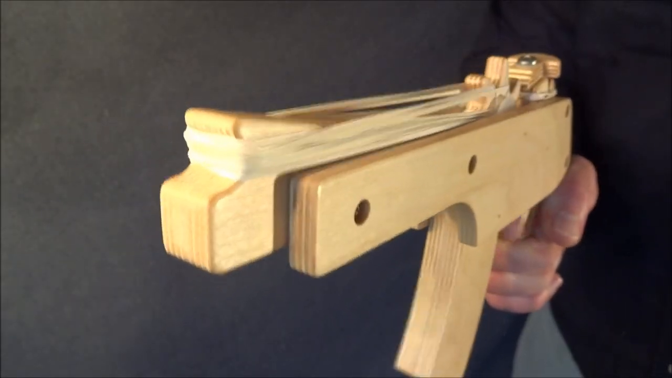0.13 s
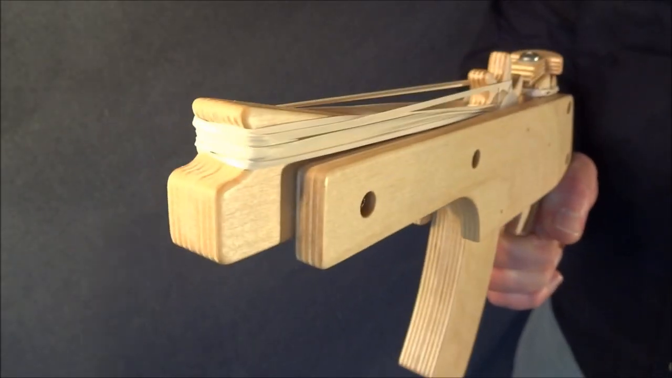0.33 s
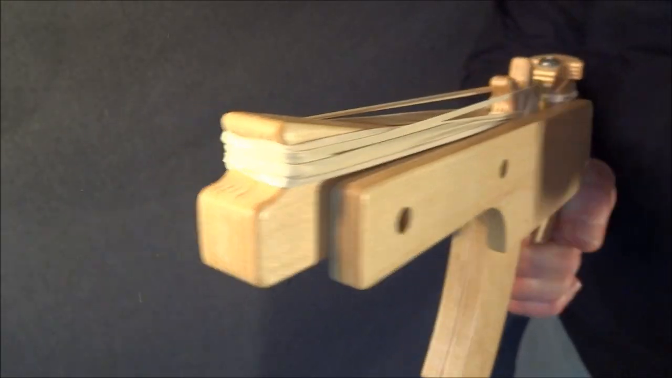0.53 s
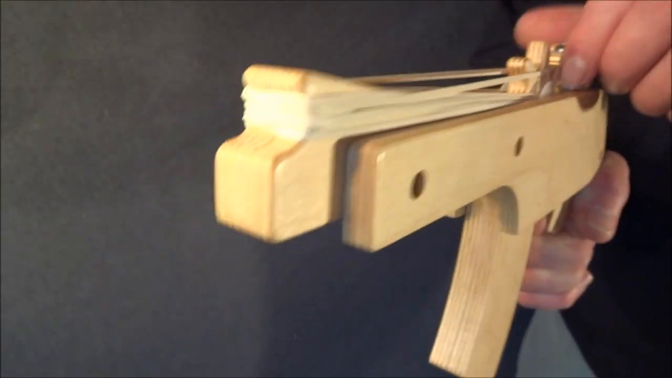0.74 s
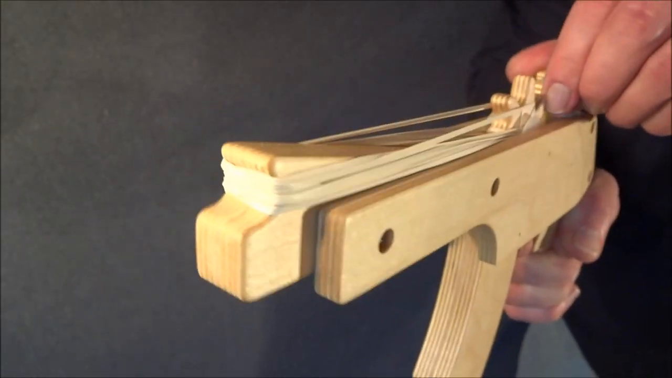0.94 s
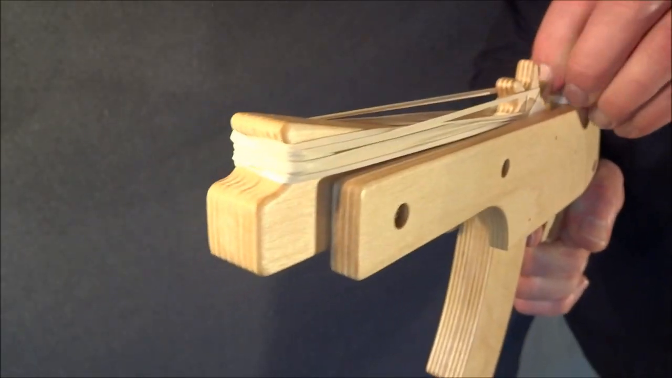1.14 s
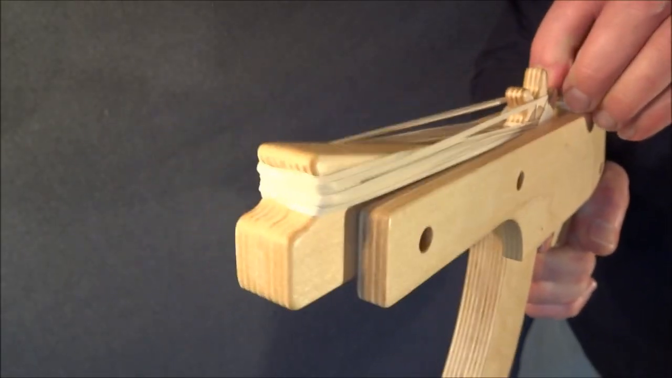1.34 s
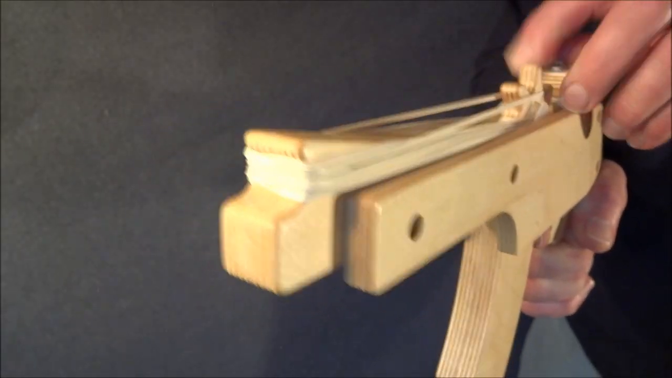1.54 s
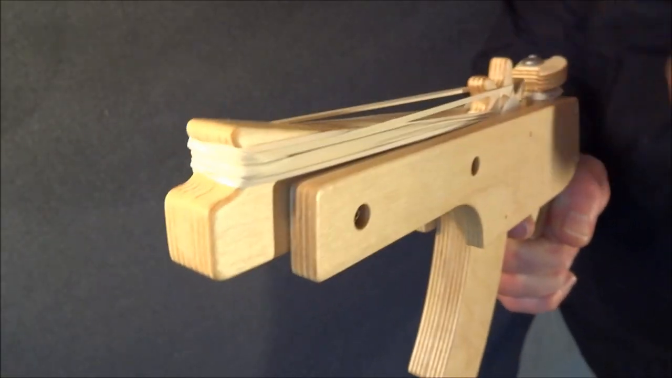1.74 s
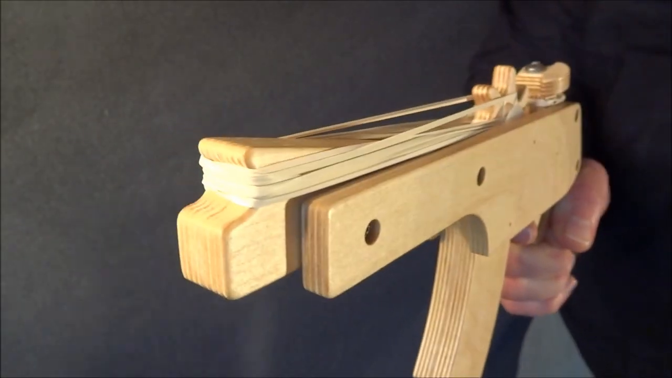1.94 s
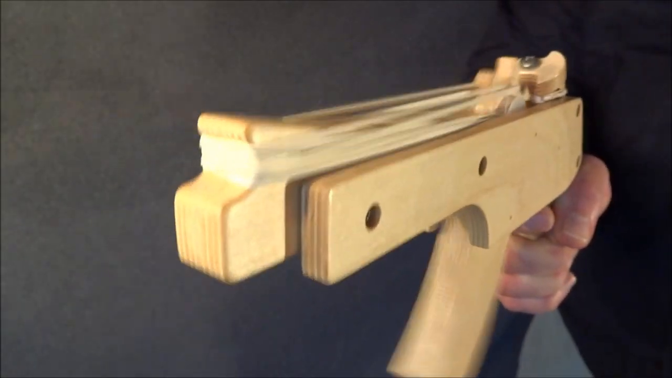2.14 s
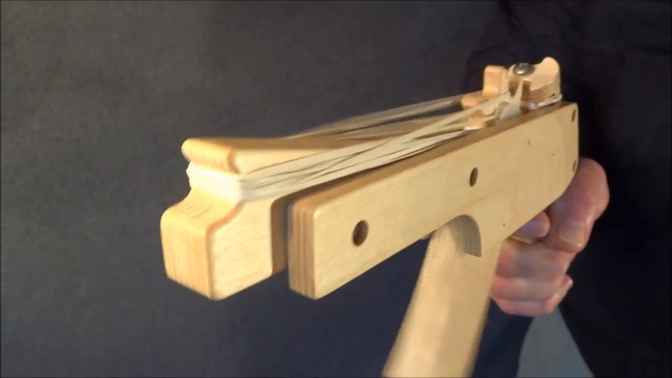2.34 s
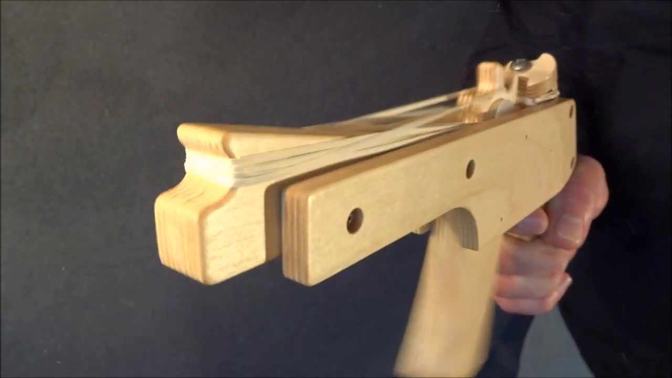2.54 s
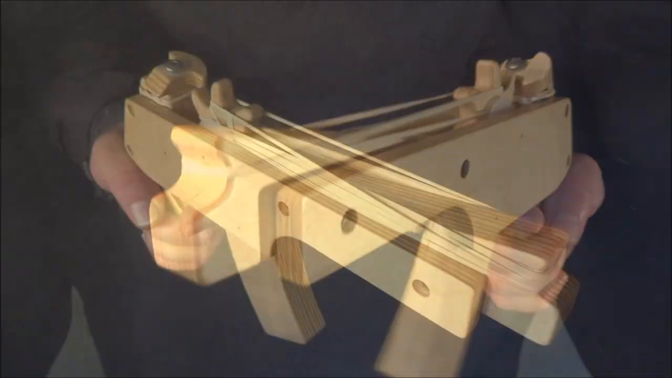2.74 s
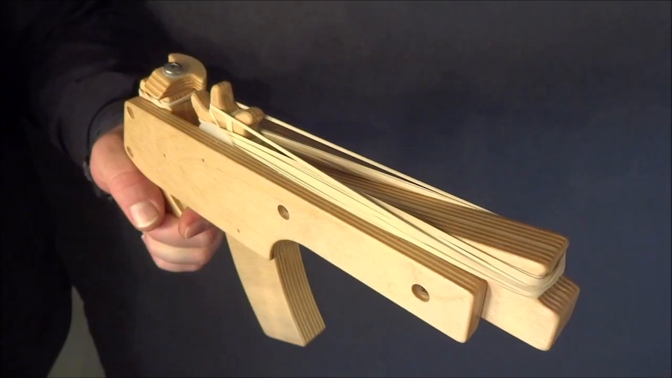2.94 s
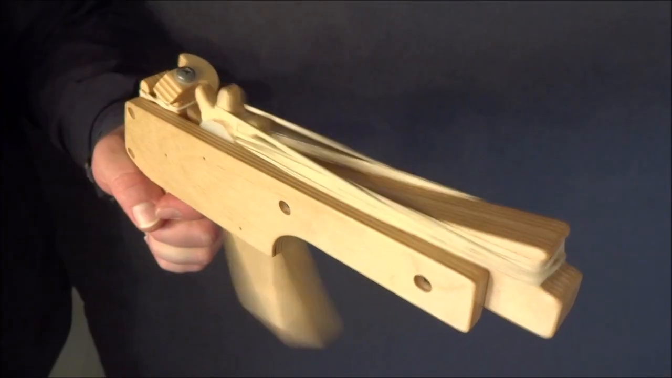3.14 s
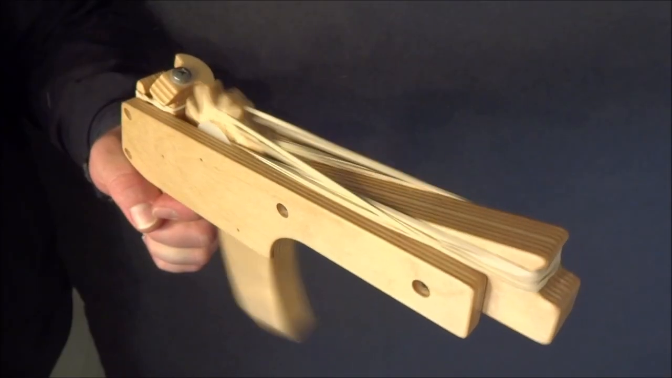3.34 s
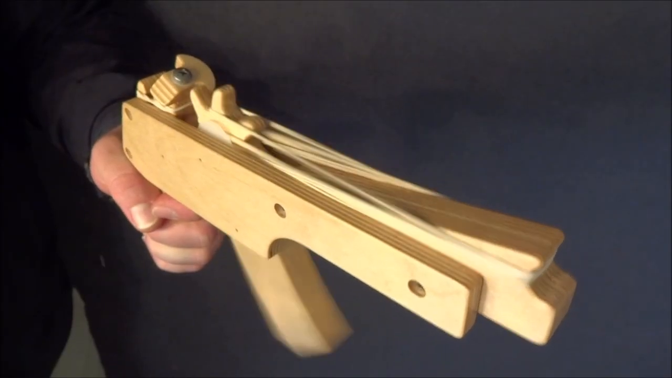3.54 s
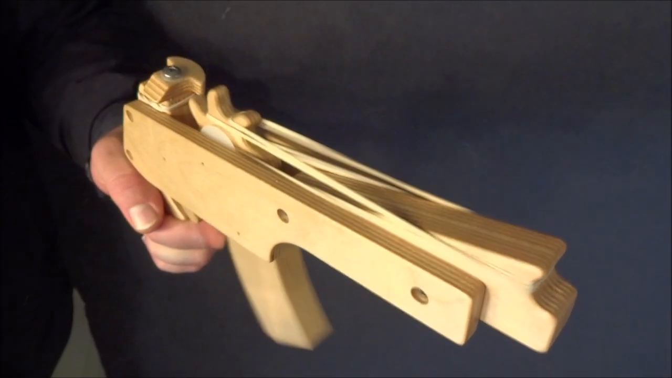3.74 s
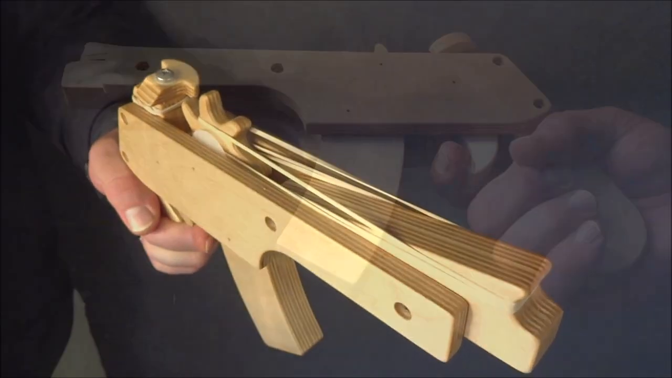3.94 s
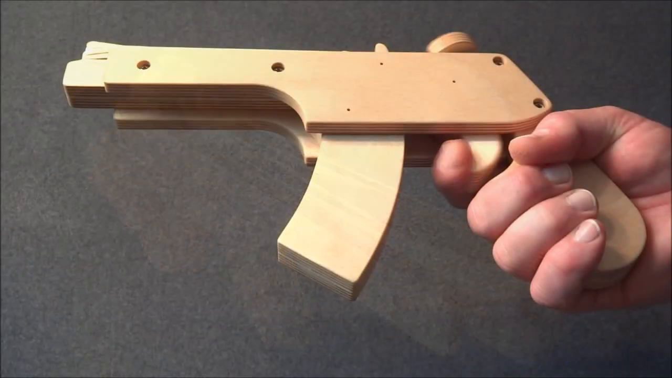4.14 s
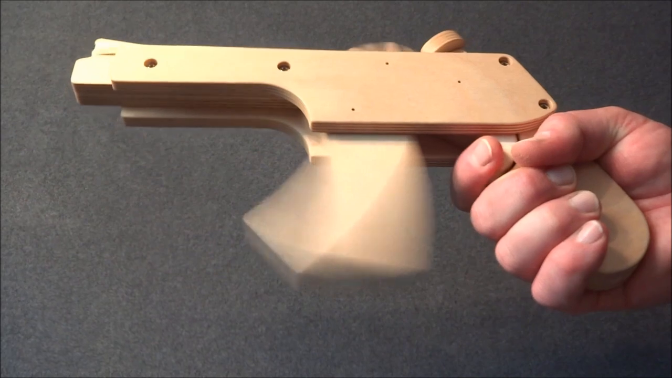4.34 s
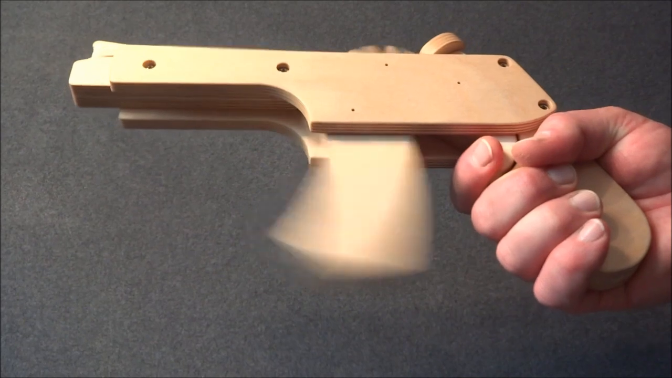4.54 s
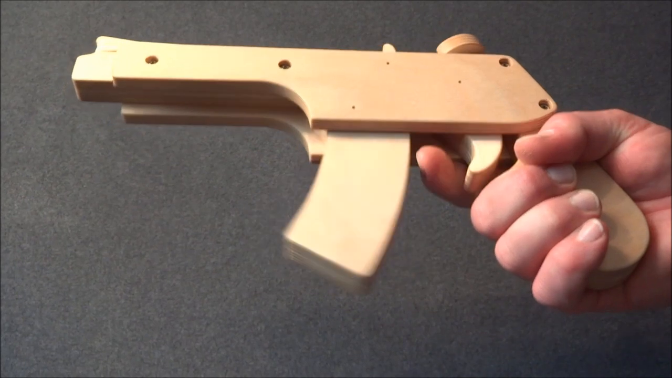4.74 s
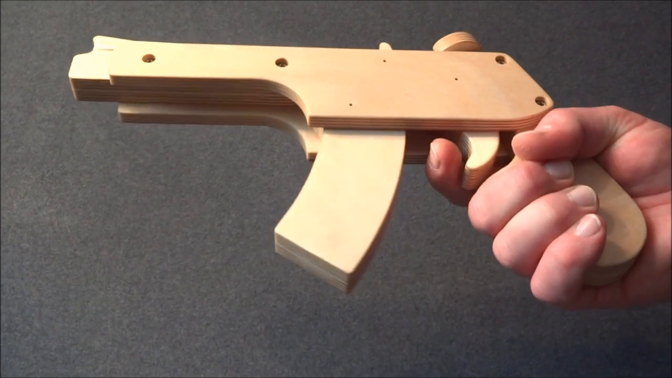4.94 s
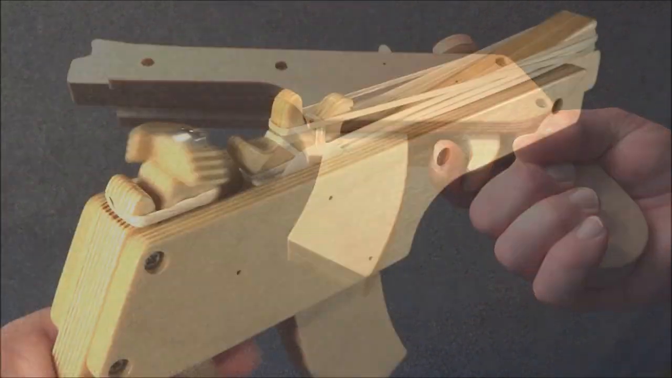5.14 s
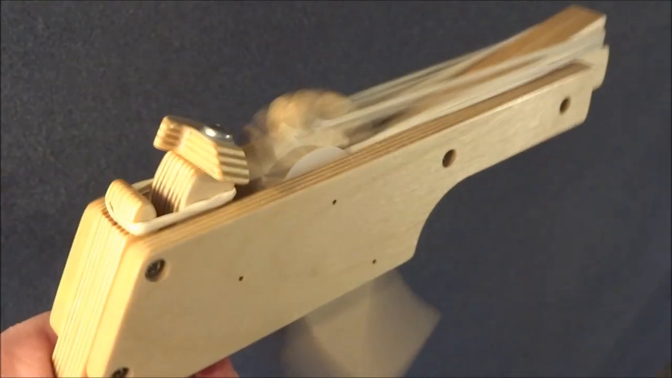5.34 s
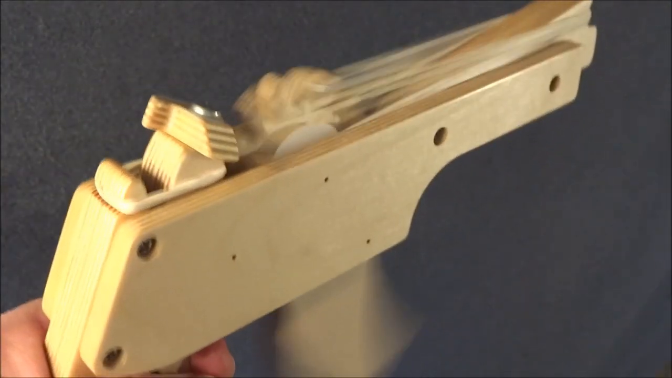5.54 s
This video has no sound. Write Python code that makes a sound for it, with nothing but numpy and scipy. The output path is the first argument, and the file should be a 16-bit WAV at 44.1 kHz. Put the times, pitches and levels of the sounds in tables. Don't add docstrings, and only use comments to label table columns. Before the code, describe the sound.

A close microphone catches a hand-made wooden toy gun indoors: one bright tick, a duller tock, a short hollow band slap, then nearly two seconds of quiet handling with rustles, light taps and a tiny squeak. Four hard, dry rattles come next, alternating ticks and tocks at roughly twenty cycles a second, easing slower. Loose clicks and short rustles fill the gaps; background hiss shifts at cuts.

```python
import sys
import numpy as np
from scipy import signal
from scipy.fft import rfft, irfft
from scipy.io import wavfile
from scipy.ndimage import uniform_filter1d, minimum_filter1d

SR = 44100
rng = np.random.default_rng(int(sys.argv[2]) if len(sys.argv) > 2 else 0)


def amplitude_ratio(level_db):
    exponent = np.asarray(level_db, float) / 20
    return 10 ** exponent


def to_wav(s):
    ch = np.atleast_2d(s).T
    pcm = np.round(np.clip(ch, -1, 1) * 32767)
    wavfile.write(sys.argv[1], SR, pcm.astype(np.int16))


N = 246959


def in_time(rows):
    s, *columns = np.transpose(rows)
    return [np.interp(np.arange(N) / SR, s, c) for c in columns]


def coloured(x, spectrum):
    hz = np.maximum(np.arange(x.shape[-1] // 2 + 1) * SR / x.shape[-1], 1)
    point_hz, point_db = np.transpose(spectrum)
    gain = amplitude_ratio(np.interp(np.log(hz), np.log(point_hz), point_db))
    return irfft(rfft(x) * gain, x.shape[-1])


def high_pass(x, hz, order=2):
    return signal.sosfilt(signal.butter(order, hz, "high", fs=SR, output="sos"), x)


def low_pass(x, hz):
    return signal.sosfilt(signal.butter(2, hz, fs=SR, output="sos"), x)


def clicks(s, size):
    out = np.full(N, 1e-18)
    np.add.at(out, np.minimum((s * SR).astype(int), N - 1), size)
    return out


def ring(x, hz, t60):
    r, w = amplitude_ratio(-60 / (t60 * SR)), 2 * np.pi * hz / SR
    return signal.lfilter([0, np.sin(w)], [1, -2 * r * np.cos(w), r * r], x)


def struck(s, db, modes, spread_db):
    luck = rng.normal(0, 1, (len(s), len(modes)))
    out = 0
    for k, (hz, mode_db, t60) in enumerate(modes):
        blows = clicks(s, amplitude_ratio(db + mode_db + spread_db * luck[:, k]))
        out = out + (-1) ** k * ring(blows, hz, t60)
    return out


# (begins [s], firing starts [s], firing ends [s])
TAKES = [
    (0, .04, .16),
    (.16, .16, .27),
    (2.0, 2.097, 2.98),
    (3.0, 3.12, 3.8),
    (4.04, 4.26, 4.8),
    (5.113, 5.235, 5.6),
]


def by_take(rows):
    begins = np.array(TAKES)[:, 0]
    take = np.searchsorted(begins, np.arange(N) / SR, "right") - 1
    return np.transpose(rows)[:, take]


def firing():
    t, (begins, starts, ends) = np.arange(N) / SR, by_take(TAKES)
    fired = np.clip(t, starts, ends) - starts
    wait = np.clip((t - begins) / (starts - begins + 1e-3), 0, 1)
    return fired, np.maximum(t - ends, 0), wait


# (pitch [Hz], level [dB per Hz])
RUMBLE = [(12, -40), (20, -4.5), (43, -13), (87, -12.5), (124, -8), (241, -16), (274, -11.5), (386, -18),
          (600, -37), (780, -71.5), (1320, -120)]
# (pitch [Hz], level [dB per Hz])
HISS = [(240, -29), (400, -2), (742, -7.5), (904, -7), (1560, -8), (1680, -10.5), (9990, -22.5),
        (11000, -36), (11500, -43.5), (15000, -68), (22000, -120)]
# (rumble [dB], hiss [dB], swell before firing [dB], rumble change while firing [dB],
# hiss change while firing [dB])
TONE_LEVELS = [(-60.5, -50, 6.3, 1.5, -10.5), (-66, -63.5, -2, 46, 10.5), (-63, -61.5, 6.5, 1.5, -1.8),
               (-61, -53.5, 1.1, -10, -5.5), (-60, -56.5, 7.5, -32, -10.5), (-56.5, -54.5, 5, -52, -10.5)]
HISS_TREBLE = [1.8, -3, -2.5, -5, 1.5, -3]
DUCK_S, RUMBLE_DUCK_S, RUMBLE_BACK_S, HISS_BACK_S = 0.075, 0.45, 0.37, 0.99
HUM_ON_S, HUM_OFF_S, HUM_DB, HUM_BEFORE_DB, HUM_HZ = 0.82, 2.1, -67.5, -77, 40
BUZZ_HZ, BUZZ_DB, BUZZ_LEFT_DB = 117, -68.5, 0.7


def room_tone():
    out, (fired, since, wait), t = 0, firing(), np.arange(N) / SR
    rumble_db, hiss_db, swell_db, rumble_duck_db, hiss_duck_db = by_take(TONE_LEVELS)
    rumble_duck = (1 - np.exp(-fired / RUMBLE_DUCK_S)) * np.exp(-since / RUMBLE_BACK_S)
    hiss_duck = (1 - np.exp(-fired / DUCK_S)) * np.exp(-since / HISS_BACK_S)
    rumble_db = rumble_db + rumble_duck_db * rumble_duck
    hiss_db = hiss_db + swell_db * wait + hiss_duck_db * hiss_duck
    treble_gain = amplitude_ratio(by_take(np.c_[HISS_TREBLE])) - 1
    for spectrum, db, wide in ((RUMBLE, rumble_db, .36), (HISS, hiss_db, .4)):
        noise = coloured(rng.standard_normal((2, N)), spectrum)
        mid, side = noise + treble_gain * high_pass(noise, 3000)
        out = out + amplitude_ratio(db) * (mid + wide * side * [[1.], [-1.]]) / mid.std()
    drone = ring(rng.standard_normal(N), HUM_HZ, 3.0)
    buzz = ring(rng.standard_normal(N), BUZZ_HZ, .9) * amplitude_ratio([[BUZZ_LEFT_DB], [-BUZZ_LEFT_DB]])
    hum = np.where(t < HUM_ON_S, amplitude_ratio(HUM_BEFORE_DB), amplitude_ratio(HUM_DB)) * (t < HUM_OFF_S)
    out = out + uniform_filter1d(hum, size=2000) * drone / drone.std()
    return out + amplitude_ratio(BUZZ_DB) * (t < HUM_OFF_S) * buzz / buzz.std()


# (time [s], peak level [dB], pitch [Hz])
KNOCKS = [(0.04, -10, 1350), (0.214, -2, 2170), (2.118, 5, 3000), (3.719, -3.5, 3160), (3.762, -2.5, 2620),
          (3.792, -3, 2700), (3.819, -24, 2300), (3.836, -36, 2950), (3.853, -52, 2680), (4.258, -10, 2180),
          (4.766, -10, 3020), (4.808, -10, 2900), (4.829, -13, 2670), (5.235, -8.5, 2070)]


def knocks():
    crack = [(1160, -14.5, 0.012), (4070, -2.0, 0.0017), (6270, -27.0, 0.0065), (9150, -29.5, 0.0058)]
    s, db, _ = np.transpose(KNOCKS)
    pitched = sum(ring(clicks(np.array([t]), amplitude_ratio(d - 3)), f, 0.021) for t, d, f in KNOCKS)
    return low_pass(struck(s, db, crack, spread_db=-3.5) + pitched, 3500)


# (tick time [s], rebound after [ms], tock after [ms])
OPENING = [
    (0.0525, 6.5, 114),
]
BURST_A = [(2.0972, 6.8, 21.1), (2.1446, 6.7, 29.1), (2.1977, 6.8, 36.7), (2.2581, 6.7, 36.7),
           (2.3191, 4.1, 33.5), (2.3773, 4.2, 37.5), (2.4407, 4.4, 37.1), (2.5039, 4.4, 36.1),
           (2.5668, 5.9, 37.8), (2.6332, 6.0, 40.5), (2.7036, 5.9, 41.5), (2.7766, 6.1, 45.6),
           (2.8555, 6.2, 51.4), (2.9502, 4.2, 52)]
BURST_B = [(3.1204, 6.2, 15.9), (3.1562, 7.9, 26.2), (3.2002, 7.8, 24.7), (3.243, 2.9, 25.8),
           (3.288, 3.1, 27.3), (3.3356, 3.2, 28.3), (3.385, 3.4, 31.0), (3.4381, 3.9, 30.0),
           (3.4905, 4.4, 32.5), (3.5469, 4.3, 33.4), (3.605, 4.7, 33.2), (3.6634, 4.9, 34.4),
           (3.7269, 5.2, 38.5)]
BURST_C = [(4.265, 7.3, 16), (4.3017, 7.5, 23.7), (4.3445, 7.5, 28.6), (4.3926, 7.4, 30),
           (4.4431, 7.8, 27.9), (4.4922, 3.3, 31.9), (4.5457, 3.8, 30.7), (4.599, 3.9, 30.1),
           (4.6526, 4.2, 32.5), (4.7096, 4.1, 34.5)]
BURST_D = [(5.2422, 6.2, 16.5), (5.2793, 6.4, 23.7), (5.3224, 6.5, 27.4), (5.369, 6.5, 27.3),
           (5.4163, 9.4, 28.4), (5.4654, 9.4, 30.1), (5.5176, 3.6, 31.5), (5.5721, 3.6, 32)]


def swings():
    return np.transpose(OPENING + BURST_A + BURST_B + BURST_C + BURST_D)


# (room [dB], direct pin [dB], stock boom [dB], bounce [dB], whip [dB])
VIEWS = [(14.5, 12, 1, -8.5, -0.5), (11, 15, -6, -20, -4), (9.5, 3.5, -2, -3.5, 4), (10, 5.5, 5.5, -7, 1.5),
         (7, 7, 7.5, -4.5, 3.5), (9, 4.5, 6, -4.5, -10.5)]
DRIFTS = [(-61, -100, 98.5, -1.5, -24), (.3, .3, -2.7, -2.3, .3), (-3.5, 6.5, -13, -10.5, -2.5),
          (-7.5, -1, -12.5, 5, -29), (-6.5, -6, -8, -10, -28), (-17, -4, 4, 23, -2.5)]


def view():
    return by_take(VIEWS) + by_take(DRIFTS) * firing()[0]


# (pitch [Hz], level [dB], time to fall 60 dB [s])
TICK_STOCK = [(1186, -14.5, 0.0041), (2057, -1, 0.0074), (2900, 0, 0.006), (3700, -4, 0.012),
              (4440, -1, 0.00258), (5100, -12, 0.015), (8230, -10.5, 0.0034), (8860, -10, 0.0028),
              (12010, -4, 0.0062)]
# (pitch [Hz], level [dB], time to fall 60 dB [s])
TOCK_STOCK = [(1496, -11.5, 0.0056), (2300, 1.5, 0.006), (3028, 3.5, 0.0053), (3353, -2, .012),
              (4030, -4, 0.0089), (5200, -5.5, 0.0059), (8040, -17, 0.0075), (9140, -18.5, 0.0044)]
# (pitch [Hz], level [dB], time to fall 60 dB [s])
PIN = [(5545, -1.5, 0.0079), (6048, -1.5, 0.011), (6424, -9.5, 0.022), (6906, -4.5, 0.005)]
# (delay [ms], level [dB])
CHATTER = [(.7, -4), (1.35, -5), (2.3, -9), (3.6, -13)]
# (tock against tick [dB], rebound lift [dB], bare crack [dB])
DIRECT = [(-.3, -3, -12), (-2.5, -3, -13.5), (-3, 8.5, -11), (2.5, 3, -8.5), (-1, -1.5, -15), (0, 0.5, -14)]
# (level [dB], change at the start [dB], puff [dB], puff drift [dB per s], stutter [dB])
LEVELS = [(-4, 2.2, -2, 2.7, -6.5), (-0.5, -0.44, -7, .3, -6), (-2.5, -5.5, -8, -1.5, -6),
          (-1.1, -0.1, -7, -28, -10.5), (-1.25, -1.3, -1.5, -20, -4.5), (-0.23, -1.95, -3, -22, -10)]
OVERSHOOT_DB, BLOW_DB, LATE_TOUCH_MS = 15, -11.5, 6.8
REBOUND_DB, REBOUND_START_DB, REBOUND_GROWS_S = -4, 3.5, 0.23
LATE_TOUCH_DB, LATE_TOUCH_DB_PER_S = -7, -11


def escapement(s, rebound_ms, stock, pin_db, stock_db, direct_pin_db, bounce_db, direct_db):
    fired, count = firing()[0][(s * SR).astype(int)], len(s)
    rebound_db = REBOUND_DB + REBOUND_START_DB * np.exp(-fired / REBOUND_GROWS_S)
    late_db = LATE_TOUCH_DB + LATE_TOUCH_DB_PER_S * fired
    weaker_db = np.r_[0 * s, rebound_db, late_db]
    s = np.r_[s, s + rebound_ms / 1000, s + LATE_TOUCH_MS / 1000]
    at, (_, lift_db, crack_db) = (s * SR).astype(int), by_take(DIRECT)
    blow_db = OVERSHOOT_DB + weaker_db + bounce_db[at] * (weaker_db != 0)
    is_rebound = np.arange(len(s)) // count == 1
    near_db = blow_db + (lift_db[at] * is_rebound + direct_db[at])
    pin = struck(s, blow_db + pin_db[at], PIN, spread_db=1.5)
    direct = struck(s, near_db + BLOW_DB, stock, spread_db=1.5)
    direct = direct + struck(s, near_db + pin_db[at], PIN, spread_db=1.5) * amplitude_ratio(direct_pin_db)
    crack = clicks(s, amplitude_ratio(near_db + crack_db[at] + .25 * (pin_db[at] + 19.5)))
    direct = direct + np.diff(crack, prepend=0)
    stutter = sum(amplitude_ratio(db) * np.roll(direct, int(ms * SR / 1000)) for ms, db in CHATTER)
    direct = direct + amplitude_ratio(by_take(LEVELS)[-1]) * stutter
    feed = struck(s, blow_db + stock_db[at], stock, spread_db=2.5) + amplitude_ratio(0.5) * pin
    return direct, feed


# (tick pin [dB], tick stock [dB], tock pin [dB], tock stock [dB])
RINGS = [(-15, -16.5, -28, -16), (-15, -19.5, -27.5, -15.5), (-19.5, -16.5, -39, -19), (-20, -16, -35, -14),
         (-15, -12.5, -21, -9.5), (-17, -14, -31.5, -13)]
LONE_TOCK_S = .1839
TOCK_REBOUND, LONGEST_REBOUND_MS = .108, 6.2


def ticks_and_tocks():
    tick_pin_db, tick_stock_db, tock_pin_db, tock_stock_db = by_take(RINGS)
    _, pin_db, _, bounce_db, _ = view()
    shots, rebound_ms, swing_ms = swings()
    tick, tick_feed = escapement(shots, rebound_ms, TICK_STOCK, tick_pin_db, tick_stock_db,
                                 pin_db, bounce_db, np.zeros(N))
    returns, return_ms = np.r_[shots + swing_ms / 1000, LONE_TOCK_S], np.r_[swing_ms, swing_ms[0]]
    heard = np.r_[splices(), np.zeros(SR)][(returns * SR).astype(int)] > .5
    back_ms = np.minimum(TOCK_REBOUND * return_ms[heard], LONGEST_REBOUND_MS)
    tock, tock_feed = escapement(returns[heard], back_ms, TOCK_STOCK, tock_pin_db, tock_stock_db,
                                 pin_db - 11.0, bounce_db, by_take(DIRECT)[0])
    return tick + tock, tick_feed + amplitude_ratio(-5.0) * tock_feed


PUFF_HZ, PUFF_DB = 291.4, -27.5


def puffs(shots):
    _, _, puff_db, puff_db_per_s, _ = by_take(LEVELS)
    released = clicks(shots, amplitude_ratio(PUFF_DB + rng.normal(0, 1, len(shots))))
    push = signal.lfilter([.5], [1, -.955], released)
    air = 0.37 + 0.55 * rng.standard_normal(N) + 0.18 * rng.standard_normal((2, N))
    puff = ring(push * air, 2.24 * PUFF_HZ, 0.0038) * amplitude_ratio(puff_db + puff_db_per_s * firing()[0])
    return high_pass(puff, 170, order=1)


# (pitch [Hz], level [dB], time to fall 60 dB [s])
WHIP = [(2110, -4, 0.011), (2194, -5, 0.024), (2314, -3.5, 0.019), (2680, -7, 0.03)]
WHIP_AFTER_S = .013


def whips(shots):
    return struck(shots + WHIP_AFTER_S, -6 + 0 * shots, WHIP, spread_db=6.0) * amplitude_ratio(view()[4])


# (pitch [Hz], level [dB])
ROOM_COLOUR = [(200, -29), (700, 4.5), (1500, 11), (2200, 4.5), (3200, 7), (6000, 8.5), (9000, 13),
               (11000, 11.5)]
ROOM_DB, ROOM_T60_S, TREBLE_T60_S, FIRST_WALL_S, SIDE_DB = -1, .32, 0.24, 0.0077, -9.5


def echoes():
    t = np.arange(int(.5 * SR)) / SR
    density = np.clip(0.033 + 8.0 * t, 0, 1)
    hits = rng.standard_normal((2, len(t))) * (rng.random((2, len(t))) < density) / np.sqrt(density)
    hits = hits * np.clip((t - .002) / FIRST_WALL_S, 0, 1) ** 2
    low = low_pass(hits, 4500)
    dying = low * amplitude_ratio(-60 * t / ROOM_T60_S) + (hits - low) * amplitude_ratio(-60 * t / TREBLE_T60_S)
    return coloured(dying, ROOM_COLOUR)


def room(x, count=6):
    turn = np.arange(N) // 1000 % count
    mid, side = sum(signal.fftconvolve(echoes(), (x * (turn == k))[None], axes=1)[:, :N]
                    for k in range(count))
    return amplitude_ratio(ROOM_DB - 39) * (mid + amplitude_ratio(SIDE_DB) * side * [[1], [-1]])


# (time [s], peak level [dB], pitch [Hz], time to fall 60 dB [s], snap [dB])
RUSTLES = [
    (0.266, -6, 3530, 0.019, -5.5),
    (0.525, -34, 3700, 0.18, -22.5),
    (0.78, -39.5, 3270, 0.17, -6),
    (0.805, -28.5, 3530, 0.32, 0),
    (0.876, -21.5, 1600, 0.083, -25),
    (0.937, -25.5, 3560, 0.12, -25),
    (3.907, -16, 4600, 0.032, -8.5),
    (4.12, -35.5, 860, 0.057, -11),
    (4.896, -25, 3260, 0.14, -4),
    (5.0, -19.5, 5200, 0.04, -4.5),
]
# (time [s], peak level [dB], pitch [Hz], time to fall 60 dB [s])
TAPS = [(0.398, -27, 1090, 0.029), (0.755, -30, 4340, 0.033), (0.897, -21, 2900, 0.059),
        (0.946, -30, 1040, 0.19), (1.039, -47, 1147, 0.047), (1.301, -30.5, 2510, .015),
        (1.586, -37.5, 2840, 0.018), (1.598, -43.5, 1480, .053), (1.633, -29.5, 2430, .015),
        (2.043, -38, 1110, .052), (2.083, -40.5, 2940, 0.092), (5.112, -41, 3490, 0.064)]
TAP_TREBLE_DB, TAP_SNAP_DB, RUSTLE_TREBLE_DB = -31, -14, 6.5


def taps_and_rustles():
    out, t = np.zeros(N), np.arange(int(.2 * SR)) / SR
    kinds = [(*row, TAP_SNAP_DB, TAP_TREBLE_DB) for row in TAPS]
    kinds += [(*row, RUSTLE_TREBLE_DB) for row in RUSTLES]
    for s, db, hz, t60, snap_db, treble_db in kinds:
        fade = amplitude_ratio(db - 11.5 - 60 * t / max(t60, .003))
        snap = amplitude_ratio(db + snap_db - 60 * t / 0.0058)
        rustle = rng.standard_normal(len(t)) * (fade + snap) * np.minimum(t / 0.00032, 1)
        body = ring(rustle, hz, 5.2 / hz) - 0.31 * ring(rustle, 1.7 * hz, 1.33 / hz)
        body = body * np.sqrt(hz / 3000) * 0.43
        top = high_pass(rustle, 4000) * amplitude_ratio(treble_db - 12.0)
        start = int(s * SR)
        out[start:start + len(t)] += high_pass(body, 300) + top
    return out


# (level [dB], pitch [Hz], time to fall 60 dB [s])
THUMP = (-9, 590, 0.0069)
THUMP_S = .2685


def band_slap():
    db, hz, t60 = THUMP
    slap = clicks(THUMP_S + np.array([0, .0014, .0042]), amplitude_ratio(db + np.array([-3., 0., -6.])))
    slap = high_pass(slap, 70)
    low = ring(slap, hz, t60) - ring(slap, 0.2 * hz, 0.28 * t60) * 0.45
    return low + ring(slap, 2.0 * hz, .5 * t60) * 0.84 - ring(slap, 2.75 * hz, 0.44 * t60) * .45


# (time [s], level [dB], pitch [Hz])
SQUEAK = [
    (1.08, -87, 3700),
    (1.1, -74, 3740),
    (1.18, -59, 3940),
    (1.2, -90.5, 3880),
]


def squeak():
    db, hz = in_time(SQUEAK)
    wobble_hz = uniform_filter1d(rng.standard_normal(N), size=90) * 1300
    flutter_db = uniform_filter1d(rng.standard_normal(N), size=300) * 90
    return amplitude_ratio(db + flutter_db) * np.sin(np.cumsum(hz + wobble_hz) * 2 * np.pi / SR)


CEILING_DB, LOOK_AHEAD_S = -4.5, .003
RELEASE_S, SLOW_RELEASE_S, SLOW_SHARE = .014, 0.11, 0.61


def limiter(x):
    over_db = np.maximum(20 * np.log10(np.abs(x).max(0) + 1e-9) - CEILING_DB, 0)
    fast, slow = (20 / s * np.arange(N) / SR for s in (RELEASE_S, SLOW_RELEASE_S))
    fast_db = np.maximum.accumulate(over_db + fast) - fast
    slow_db = np.maximum.accumulate(SLOW_SHARE * over_db + slow) - slow
    ahead = int(LOOK_AHEAD_S * SR)
    held = -minimum_filter1d(-np.maximum(fast_db, slow_db), ahead + 1, origin=-(ahead // 2))
    return x * amplitude_ratio(-uniform_filter1d(held, size=15) * .94)


# (from [s], to [s], level [dB])
CUTS = [
    (2.974, 3.005, -26),
    (3.005, 3.108, -60),
    (4.04, 4.25, -25),
    (5.11, 5.228, -30),
]


def splices():
    t = np.arange(N) / SR
    cut_db = sum(db * ((t > start) & (t <= end)) for start, end, db in CUTS) + 0.
    return amplitude_ratio(uniform_filter1d(cut_db, size=90))


BOOM_HZ, LOW_CUT_HZ, DIP_S = 2170, 415, 0.13


def scene():
    shots = swings()[0]
    room_db, _, boom_db, _, _ = view()
    level_db, dip_db, _, _, _ = by_take(LEVELS)
    blows, feed = ticks_and_tocks()
    feed = feed + whips(shots)
    loose = knocks()
    hands = taps_and_rustles() + band_slap() + squeak()
    gun = blows + loose + room(amplitude_ratio(room_db) * feed + amplitude_ratio(3.0) * loose + amplitude_ratio(-5.5) * hands)
    band = signal.butter(1, [0.99 * BOOM_HZ, 1.08 * BOOM_HZ], "band", fs=SR, output="sos")
    gun = limiter(gun + (amplitude_ratio(boom_db) - 1) * signal.sosfilt(band, gun))
    gun = high_pass(gun, LOW_CUT_HZ, order=3)
    level = amplitude_ratio(level_db + dip_db * np.exp(-firing()[0] / DIP_S))
    return (gun + puffs(shots)) * splices() * level + hands + room_tone()


def top_cut(x):
    return signal.sosfilt(signal.butter(12, 12360, fs=SR, output="sos"), x)


EDGE_HZ, EDGE_LIFT_DB, CUTOFF_HZ = 10740, 8, 11736


def record(dry):
    w, r = 2 * np.pi * EDGE_HZ / SR, np.exp(-np.pi * 300 / SR)
    lift = signal.lfilter(np.array([1, 0, -1]) * (1 - r * r) / 2, [1, -2 * r * np.cos(w), r * r], dry)
    mix = dry + (amplitude_ratio(EDGE_LIFT_DB) - 1) * lift
    mix = signal.sosfilt(signal.cheby2(14, 60, CUTOFF_HZ, fs=SR, output="sos"), mix)
    return top_cut(mix)


dry = scene()
out = record(dry)
to_wav(out)
```